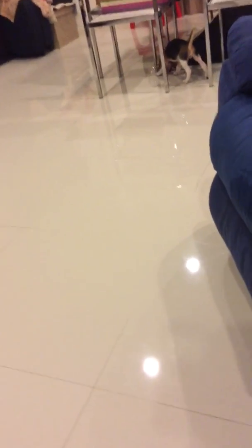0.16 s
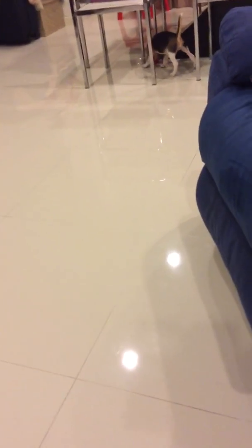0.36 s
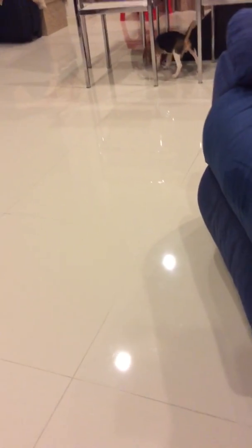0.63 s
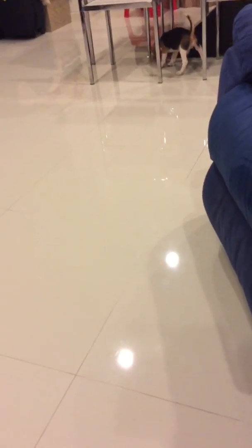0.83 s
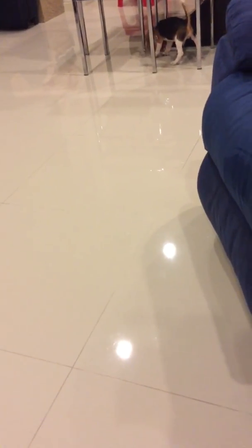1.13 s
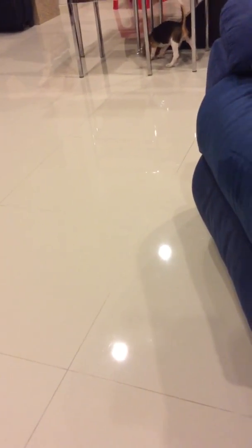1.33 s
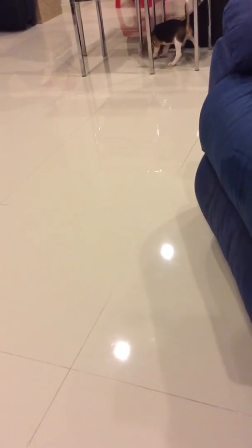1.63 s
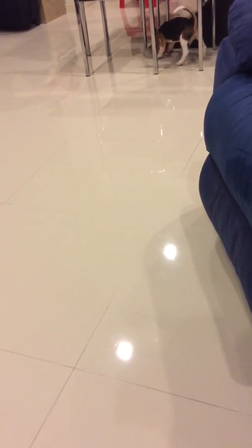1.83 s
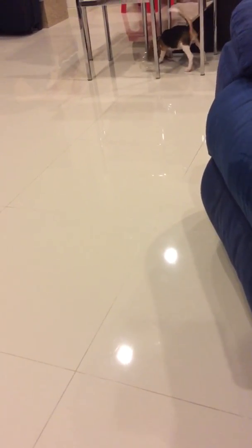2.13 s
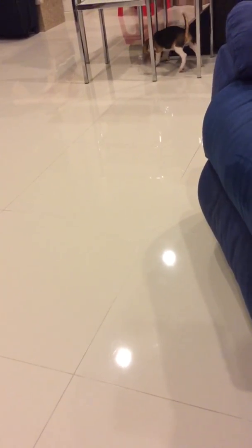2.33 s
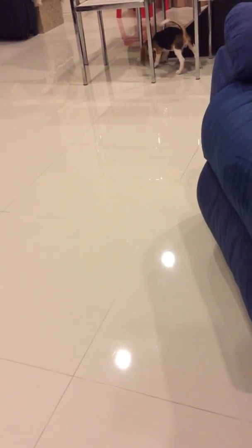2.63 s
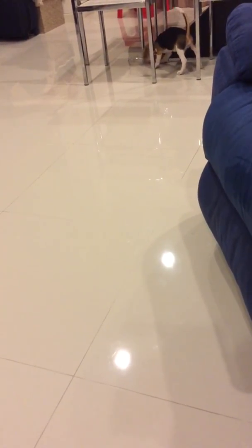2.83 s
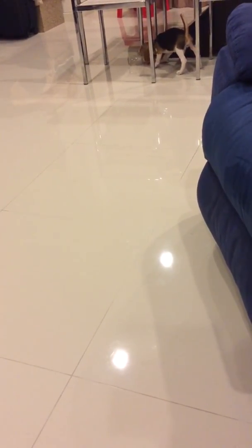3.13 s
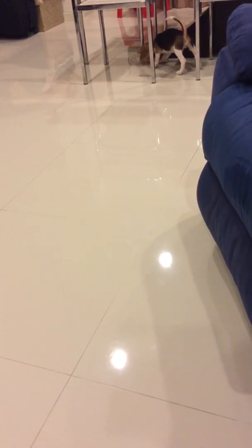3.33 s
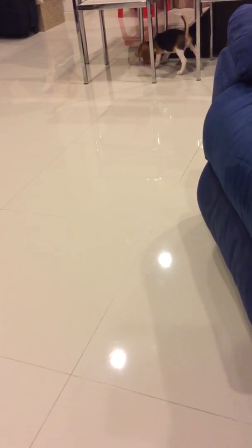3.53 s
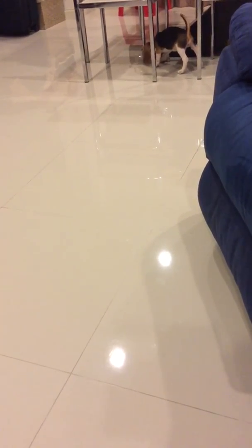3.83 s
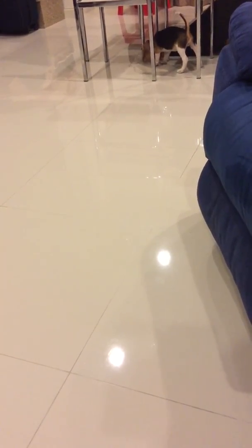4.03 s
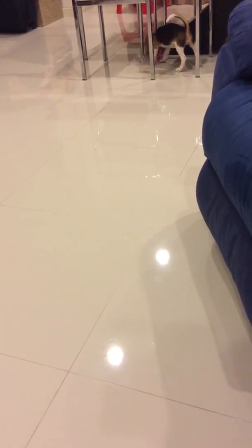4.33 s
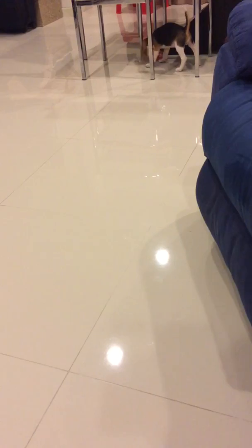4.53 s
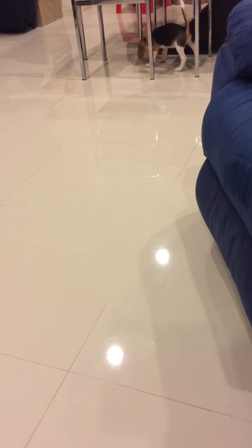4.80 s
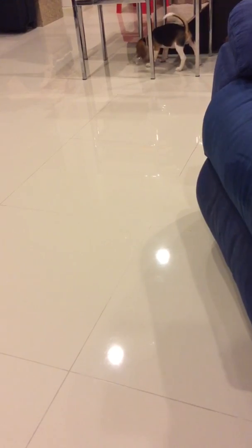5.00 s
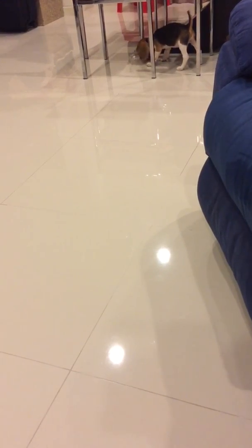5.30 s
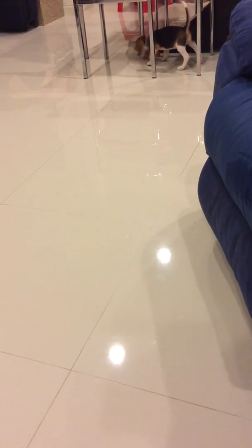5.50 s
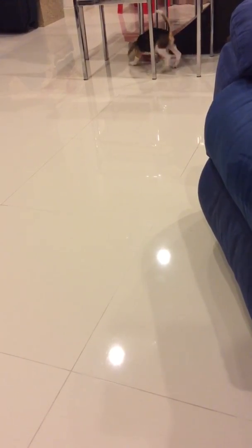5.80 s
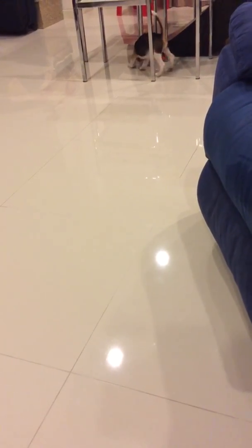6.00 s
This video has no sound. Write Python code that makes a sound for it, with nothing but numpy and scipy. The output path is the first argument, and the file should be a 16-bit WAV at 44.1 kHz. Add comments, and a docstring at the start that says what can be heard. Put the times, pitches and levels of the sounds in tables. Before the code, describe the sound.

Across a hard tiled living room, a dog bites and knocks an empty plastic bottle. Sharp wall crackles and short hollow clonks come in uneven clusters, with brief gritty scuffs between. The strongest clonk falls near four seconds; later it is sparser, ending with low thumps. A handheld microphone some metres away catches short bright reverberation and soft room tone.

```python
"""An empty plastic bottle is bitten and knocked about by a dog across a tiled living room.
Each blow rings the bottle's damped modes and cracks its wall with clicks smeared by all-pass filters.
Between blows, random catches and hiss make scuffs over the tiles, and a collar tag tinks as decaying sines.
The room answers with a noise tail and a far-wall echo; low bumps reach the hand-held microphone,
over a shaped-noise room tone."""
import sys
import numpy as np
from scipy import signal
from scipy.fft import rfft, irfft
from scipy.io import wavfile

SR = 44100
rng = np.random.default_rng(int(sys.argv[2]) if len(sys.argv) > 2 else 0)


def materialize(psi):
    """Save the field psi as 16-bit PCM at rate SR to the path in sys.argv[1].

    A 1-D psi becomes a single channel; in a 2-D psi each row is a channel.
    """
    bounded = np.clip(np.atleast_2d(psi).T, -1, 1)
    quanta = np.round(bounded * 32767).astype(np.int16)
    wavfile.write(sys.argv[1], SR, quanta)


N = 271215  # length in samples

# Bottle modes before the pitch and damping factors: (frequency [Hz], level [dB], T60 [s])
BOTTLE_MODES = [(200, -6.5, 0.038), (304, 5.5, 0.028), (504, -3.5, 0.05), (1013, -18, 0.065),
                (1100, -1, 0.043), (1178, -4.5, 0.049), (1434, 9, 0.0091), (1755, 0, 0.012),
                (2075, -0.5, 0.018), (2407, -23, 0.004)]
# Base, belly and shoulder of the bottle: (lowest mode [Hz], highest mode [Hz])
BOTTLE_PARTS = [(120, 750), (750, 1400), (1400, 3600)]
# Dull knocks on the tiles: (time [s], belly ring [dB], base thud against the ring [dB],
# wall crack against the ring [dB], decay-rate factor [x])
KNOCKS = [(0.07, -27.5, -18, -14, 1.1), (0.791, -15.5, -27, 7, 1.8), (1.296, -19.5, -13, -15, 2.5),
          (2.183, -17.5, -19.5, -10, 1.27), (2.445, -10.5, -26, -1.5, 1.33), (2.798, -33.5, -20, 1.5, 0.85),
          (3.049, -40.5, -5.5, -1.5, 1.9), (3.499, -32, -13.5, 7, 1.2), (3.822, -46, 3.5, -3, 1.5),
          (3.867, -3.5, -29, 1.5, 1.3), (5.422, -25.5, -3, -9, 2), (5.465, -18.5, 0, 9, 1.56),
          (6.054, -33.5, -3.5, -1, 1.8)]
# Bites that buckle the wall: (time [s], shoulder ring [dB], belly ring against the shoulder [dB],
# wall crack against the shoulder [dB], bright snap against the crack [dB])
BITES = [(0.242, -44.5, -2.5, 24, -3), (0.41, -35, 16, 27, -28), (0.417, -11.5, -12.5, 24.1, -54),
         (0.632, -32.5, 12, 31.3, -10), (0.649, -11.5, -19, 27.6, 3), (0.958, -16.5, -3.5, 29.45, -7.5),
         (1.211, -43.5, 2, 25.7, -24), (1.414, -33, -2, 10, -11), (1.62, -11, -8.5, 21.7, -27),
         (3.017, -38, -10, 21.3, -11), (3.514, -41.5, 12, 28.4, -16), (3.993, -22.5, -1.5, 23, -16),
         (4.352, -24, 4.5, 22.2, -29), (4.362, -18, -5.5, 22.9, -13), (5.456, -24.5, 6, 27.9, -7)]
# All-pass delays of the wall's rattle: (delay [ms])
RATTLE_DELAYS = [.11, .23, .41, .67]
# Scuffs over the tiles: (start [s], length [s], body level [dB],
# base rumble against the body [dB], hiss against the body [dB])
SCUFFS = [(0.235, 0.018, -37.5, -20, -5.5), (0.602, 0.058, -36, -8.5, -9.5),
          (1.175, 0.068, -41, -15.5, -16.5), (1.372, 0.11, -47, -3, -6.5), (1.821, 0.081, -46.5, -5.5, -10),
          (2.225, 0.046, -43, -16, -12.5), (2.783, 0.051, -43, -11, -7.5),
          (3.019, 0.12, -48.5, -7.5, -19.5), (3.39, 0.1, -52.5, -14, -11.5), (3.45, 0.11, -40.5, -12, -14),
          (3.699, 0.1, -48.5, -9.5, -22.5), (3.788, 0.071, -42, -4.5, -18.5),
          (4.11, 0.026, -35.5, 5, -25.5), (4.258, 0.073, -67.5, -10, 5.5), (4.357, 0.033, -19.5, -7, -13.5),
          (4.549, 0.059, -48.5, -16, -10.5), (4.74, 0.059, -57, -0.5, -16),
          (5.435, 0.076, -30.5, -6.5, -10), (5.625, 0.098, -40, -4.5, -10),
          (5.789, 0.031, -41.5, -20, -27.5), (5.951, 0.056, -53.5, 5.5, -10),
          (6.041, 0.061, -47.5, 6.5, -16)]
# Relative spectrum of the scuff hiss: (frequency [Hz], density [dB per Hz])
HISS_SPECTRUM = [(1180, -29), (2000, -26), (2440, -12), (3530, -2.5), (4860, -16.5), (5980, -9.5),
                 (13300, -23.5), (15700, -29)]
# Collar tag tinks: (time [s], level [dB])
TINKS = [(2.139, -51.5), (2.195, -62), (2.244, -66), (2.299, -68), (2.33, -63.5), (3.974, -51),
         (4.029, -49.5)]
# Collar tag modes: (frequency [Hz], level [dB], T60 [s])
TAG_MODES = [(4300, 0, .14), (4345, -3, .14), (10400, -6, .2), (11350, -6, .2)]
# Room decay across the spectrum: (frequency [Hz], T60 [s])
ROOM_T60 = [(200, 0.67), (600, 0.42), (1100, 0.31), (2000, 0.41), (3700, 0.4), (9700, 0.33)]
# Low bumps through floor and hand: (time [s], level before the band-pass [dB], frequency [Hz])
BUMPS = [(0.955, -31, 225), (1.826, -36, 126), (1.868, -30.5, 107.4), (3.858, -35, 195), (4.354, -23, 180),
         (4.396, -26, 250), (5.4, -21, 75.4), (5.438, -21, 60.4), (5.497, -15.5, 71), (5.599, -26, 63.14),
         (5.678, -19, 109), (5.727, -21.5, 60), (5.893, -36.5, 97), (5.982, -28, 137), (6.006, -14.5, 80),
         (6.026, -11, 122), (6.037, -12, 63.2), (6.08, -21.5, 88)]
# Relative spectrum of the room tone: (frequency [Hz], density [dB per Hz])
AIR_SPECTRUM = [(15, -49.5), (25, -14.5), (91, 3), (221, -8.5), (281, -9.5), (445, -13), (703, -11.5),
                (848, -5.5), (1200, -4), (1620, -10), (2170, -10.5), (2560, -16), (4870, -30.5),
                (12800, -40), (15500, -36)]

KNOCK_SHOULDER_DB, KNOCK_SNAP_DB = -8, -10  # against the belly ring; against the crack
BITE_BASE_DB = -20  # against the shoulder ring
KNOCK_PITCH, BITE_PITCH = 0.97, 0.94  # frequency factors; the squeezed bottle rings lower
JAW_DAMPING = 2  # decay-rate factor while held in the jaws
CONTACT_S = 0.00033  # time constant of the rings' build-up during contact
CREASES, CREASE_SPAN_S, CREASE_DB = 6, 0.022, -13  # weaker clicks after each crack
MODE_SPREAD_DB, CREASE_SPREAD_DB = 1.5, 2.5  # random spread in strength
RATTLE_SMEAR = 0.55  # all-pass coefficient
SWELL_S, FADE_S, SWELL_CURVE = 0.016, 0.03, 1.1  # shortest scuff swell, fade-out, swell exponent
CATCHES_PER_S = 450  # average density of catches on the tiles
SETTLE_S, NUDGE_S = 0.12, 0.03  # after this pause the bottle has moved, this long before the blow
ROOM_DB, ROOM_RISE_S = -3, 0.0035
ECHO_S, ECHO_DB, ECHO_SPREAD_S = 0.039, 4, 0.005  # far-wall bulge in the tail
BUMP_T60_S = 0.082
AIR_DB = -51
CUTOFF_HZ = 16300


def blows():
    """Teeth, paws and tiles strike the bottle; soft contact keeps each group of modes narrow."""
    rows = all_blows()
    out = np.zeros(N + SR)
    ring_length = SR // 4
    t = np.arange(ring_length) / SR
    build_up = 1 - np.exp(-t / CONTACT_S)
    luck = rng.standard_normal((len(rows), len(BOTTLE_MODES)))
    for (start, *levels_db, pitch, damping), chances in zip(rows, luck):
        at = int(start * SR)
        # levels_db runs on past the three parts to crack and snap, which zip leaves out here
        for (low, high), part_db in zip(BOTTLE_PARTS, levels_db):
            rings = np.zeros(ring_length)
            for (hz, mode_db, t60), chance in zip(part(low, high, pitch), chances):
                decaying_db = mode_db + MODE_SPREAD_DB * chance - 60 * damping * t / t60
                rings += from_db(decaying_db) * np.sin(2 * np.pi * hz * t)
            narrow = band(rings * build_up, 0.63 * low, 1.07 * high)
            out[at:at + ring_length] += from_db(part_db) * narrow
    times, wall_db, snap_db = rows.T[[0, 4, 5]]
    wall = band(band(crack(times, wall_db), 1600, 5170), 1200, 9000)
    snap = band(crack(times, snap_db), 4100, 8800)
    return out[:N] + wall + snap


def all_blows():
    """Merge in time: (time [s], base, belly, shoulder, wall, snap [dB], pitch, damping [x])."""
    knocks = [(s, db + thud, db, db + KNOCK_SHOULDER_DB,
               db + wall, db + wall + KNOCK_SNAP_DB, KNOCK_PITCH, damping)
              for s, db, thud, wall, damping in KNOCKS]
    bites = [(s, db + BITE_BASE_DB, db + belly, db,
              db + wall, db + wall + snap, BITE_PITCH, JAW_DAMPING)
             for s, db, belly, wall, snap in BITES]
    return np.array(sorted(knocks + bites))


def part(low_hz, high_hz, pitch=1):
    """Pick the bottle modes between two frequencies and scale them by the present shape."""
    return [(hz * pitch, db, t60) for hz, db, t60 in BOTTLE_MODES if low_hz < hz < high_hz]


def crack(times, levels_db):
    """The wall buckles, then creases on in weaker clicks; its own rattle smears them all."""
    out = np.zeros(N)
    late = rng.random((len(times), CREASES))
    luck = rng.standard_normal((len(times), CREASES))
    # later creases are weaker
    creases_db = levels_db[:, None] + CREASE_DB * (1 + late) + CREASE_SPREAD_DB * luck
    crease_at = ((times[:, None] + CREASE_SPAN_S * late) * SR).astype(int)
    out[crease_at] = from_db(creases_db) * np.sign(luck)
    out[(times * SR).astype(int)] = from_db(levels_db)
    for ms in RATTLE_DELAYS:
        loop = np.r_[1, np.zeros(int(ms * SR / 1000) - 1), RATTLE_SMEAR]
        out = signal.lfilter(loop[::-1], loop, out + 1e-18)  # all-pass
    return out


def scuffs():
    """Dense uneven catches on the tiles shake the bottle's modes and hiss."""
    t = np.arange(N) / SR
    gains = np.zeros((3, N))
    struck = all_blows()[:, 0]
    for start, length, db, base_db, hiss_db in SCUFFS:
        # a scuff that runs into a blow swells right up to it
        swell = max([SWELL_S, *(struck[struck < start + length - FADE_S] - start)])
        rise = np.clip((t - start) / swell, 0, 1) ** SWELL_CURVE
        fade = np.clip((start + length - t) / FADE_S, 0, 1)
        levels_db = [db + base_db, db, db + hiss_db]
        gains += from_db(levels_db)[:, None] * rise * fade
    sizes = from_db(3.5 * np.minimum(rng.exponential(1, N), 3.5))
    signed_sizes = sizes * rng.choice([-1, 1], N)
    catches = signed_sizes * (rng.random(N) < CATCHES_PER_S / SR)
    base = rms_one(band(shaken(catches, 120, 750), 84, 570))
    body = rms_one(band(shaken(catches, 750, 3600), 321, 3200))
    grit = rng.standard_normal(N) + 0.091 * rms_one(catches)
    hiss = coloured(grit, HISS_SPECTRUM)
    return gains[0] * base + gains[1] * body + gains[2] * hiss


def shaken(catches, low_hz, high_hz):
    """Catches keep the bottle modes between two frequencies ringing."""
    return sum(from_db(db) * ring(catches, hz, t60) for hz, db, t60 in part(low_hz, high_hz))


def collar_tag():
    """The tag tinks: each touch rings its high modes."""
    times, levels_db = np.transpose(TINKS)
    return band(strike(times, levels_db, TAG_MODES, scatter_db=1.0), 3100, 10000)


def room(x):
    """Every place of the bottle has reflections of its own."""
    struck = all_blows()[:, 0]
    moves = struck[1:][np.diff(struck) > SETTLE_S] - NUDGE_S
    cuts = [0, *(moves * SR).astype(int), N]
    out = np.zeros(N + SR)
    for start, stop in zip(cuts, cuts[1:]):
        wet = signal.fftconvolve(x[start:stop], reflections())
        out[start:start + len(wet)] += wet
    return from_db(ROOM_DB) * out[:N]


def reflections():
    """Dense echoes swell, die by band and bunch up once off the far wall; unit energy."""
    t = np.arange(SR // 2) / SR
    edges = 40 * 2 ** np.arange(0, 9, 0.5)  # half-octave bands [Hz]
    white = rng.standard_normal((2, len(t)))
    tail = np.zeros(len(t))
    for k, (low, high) in enumerate(zip(edges, edges[1:])):
        dying = from_db(-60 * t / at_hz(ROOM_T60, np.sqrt(low * high)))
        tail += band(white[k % 2], low, high) * dying  # neighbouring bands use different noise
    rise = 1 - np.exp(-(t / ROOM_RISE_S) ** 2)
    echo = from_db(ECHO_DB * np.exp(-((t - ECHO_S) / ECHO_SPREAD_S) ** 2))
    tail *= rise * echo
    return tail / np.sqrt(np.sum(tail ** 2))


def bumps():
    """Each jolt through floor and hand swings a few low, dying cycles."""
    out = sum(strike([s], db, [(hz, 0, BUMP_T60_S)], scatter_db=0) for s, db, hz in BUMPS)
    return band(out, 40, 640)


def room_tone():
    """Noise shaped like the air of the room, wavering a little in level."""
    waver = coloured(rng.standard_normal(N), [(1, 0), (6, 0), (30, -30), (100, -80)])
    return from_db(AIR_DB + 0.8 * waver) * coloured(rng.standard_normal(N), AIR_SPECTRUM)


def strike(times, levels_db, modes, scatter_db):
    """Every strike meets each mode with a strength of its own, spread by scatter_db."""
    at = (np.asarray(times) * SR).astype(int)
    out = np.zeros(N)
    luck = rng.standard_normal((len(at), len(modes)))
    for k, (hz, db, t60) in enumerate(modes):
        clicks = np.zeros(N)
        clicks[at] = from_db(levels_db + db + scatter_db * luck[:, k])
        out += ring(clicks, hz, t60)
    return out


def ring(clicks, hz, t60):
    """A two-pole resonator: a unit click starts a decaying sine of height 1."""
    r = from_db(-60 / (t60 * SR))  # decay per sample
    w = 2 * np.pi * hz / SR
    return signal.lfilter([0, np.sin(w)], [1, -2 * r * np.cos(w), r * r], clicks + 1e-18)


def coloured(x, spectrum):
    """Give a white signal a spectrum; rms 1."""
    hz = np.maximum(np.fft.rfftfreq(len(x), 1 / SR), 1)
    return rms_one(irfft(rfft(x) * from_db(at_hz(spectrum, hz)), len(x)))


def band(x, low_hz, high_hz):
    """Butterworth band-pass, upper edge at most 18 kHz."""
    sos = signal.butter(2, [low_hz, min(high_hz, 18000)], "band", fs=SR, output="sos")
    return signal.sosfilt(sos, x)


def at_hz(points, hz):
    """Read a frequency table by interpolating along log frequency."""
    table = np.array(points)
    return np.interp(np.log(hz), np.log(table[:, 0]), table[:, 1])


def from_db(db):
    """Decibels to amplitude."""
    return 10 ** (np.asarray(db) / 20)


def rms_one(x):
    """Scale to an rms of 1."""
    return x / np.sqrt(np.mean(x ** 2) + 1e-20)


def scene():
    """Bottle and tag sound direct and through the room, over bumps and room tone."""
    far = blows() + scuffs() + collar_tag()
    return (far + room(far) + bumps() + room_tone())[None]


def record(dry):
    """The microphone drops the deepest bass, peaks are rounded, the top is cut."""
    lean = signal.sosfilt(signal.butter(2, 45, "high", fs=SR, output="sos"), dry)
    rounded = np.tanh(lean)
    return signal.sosfilt(signal.cheby2(14, 70, CUTOFF_HZ, fs=SR, output="sos"), rounded)


dry = scene()
out = record(dry)
materialize(out)
```